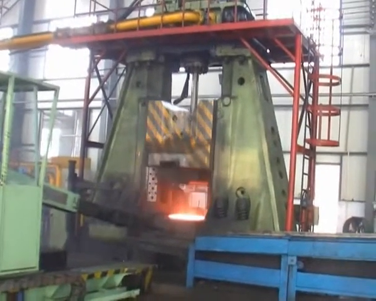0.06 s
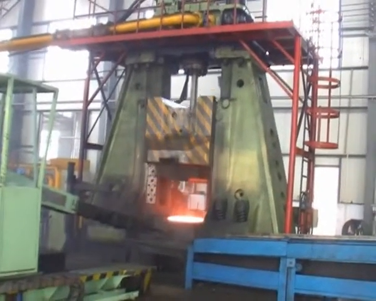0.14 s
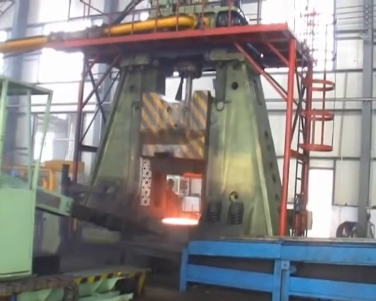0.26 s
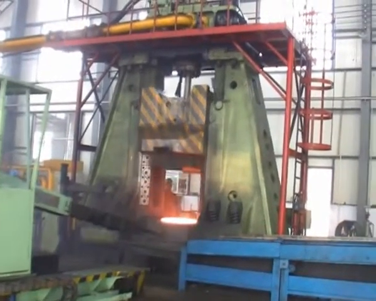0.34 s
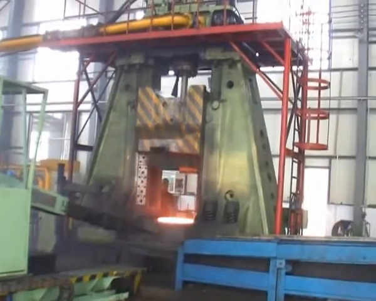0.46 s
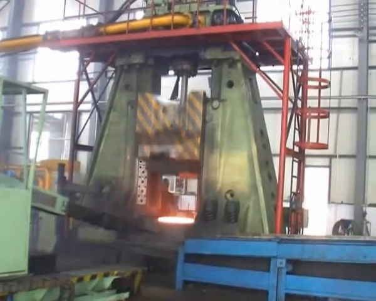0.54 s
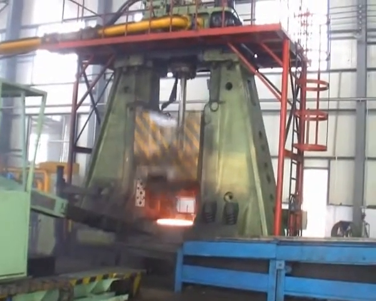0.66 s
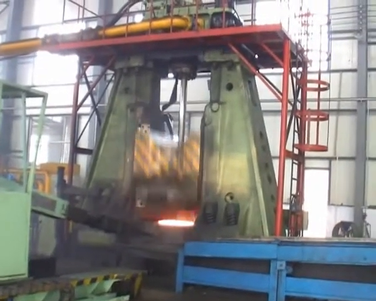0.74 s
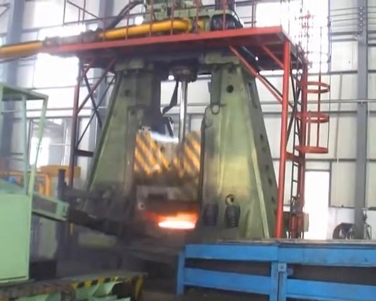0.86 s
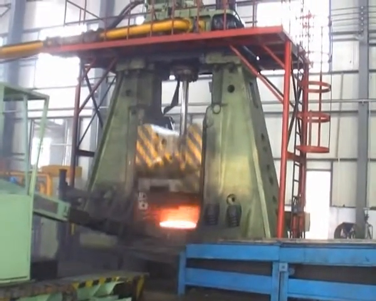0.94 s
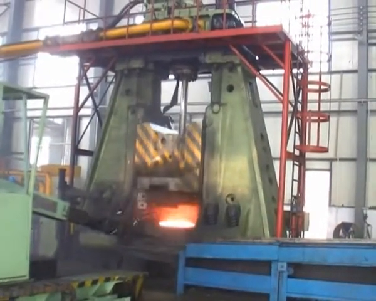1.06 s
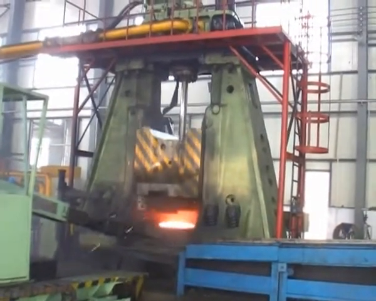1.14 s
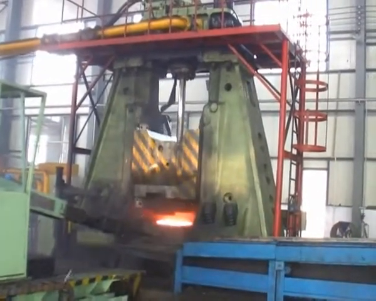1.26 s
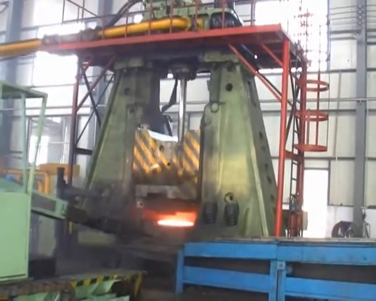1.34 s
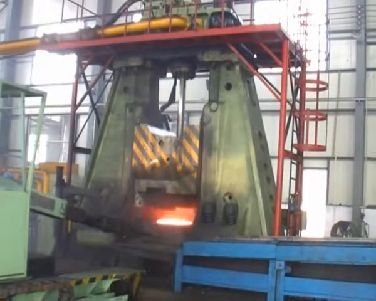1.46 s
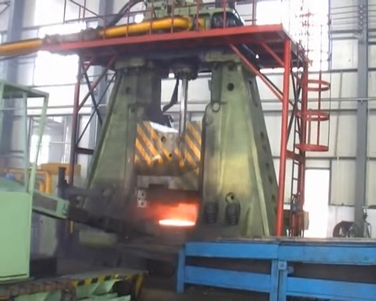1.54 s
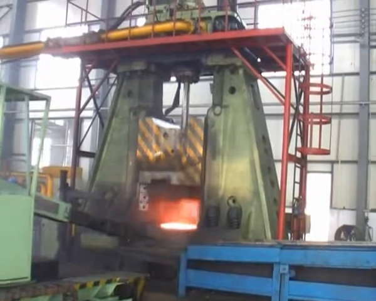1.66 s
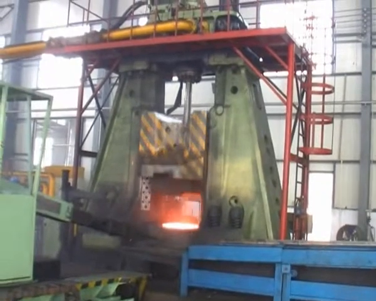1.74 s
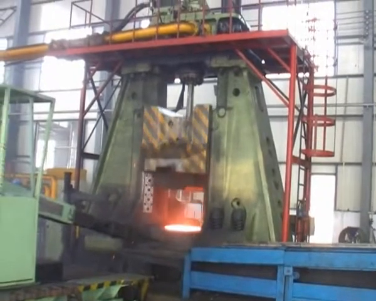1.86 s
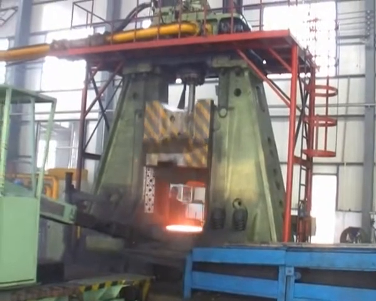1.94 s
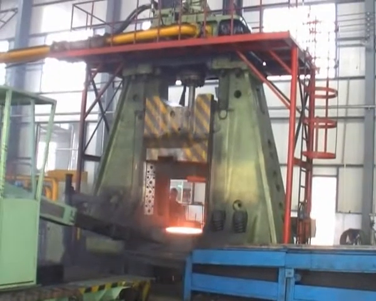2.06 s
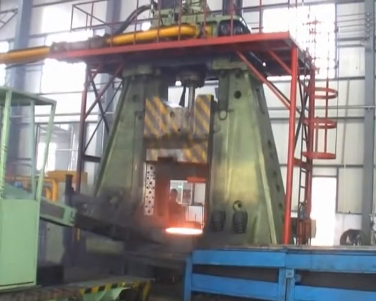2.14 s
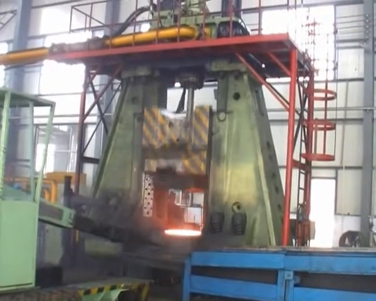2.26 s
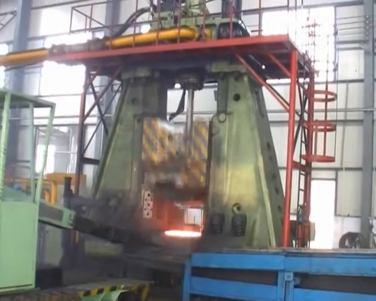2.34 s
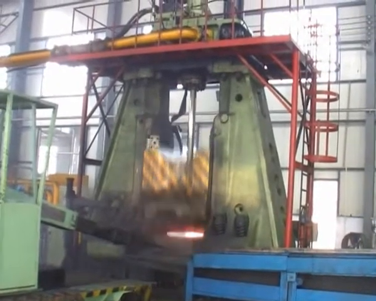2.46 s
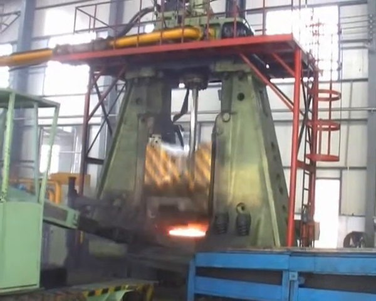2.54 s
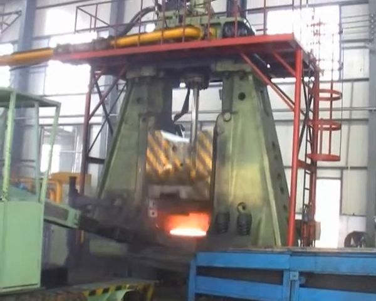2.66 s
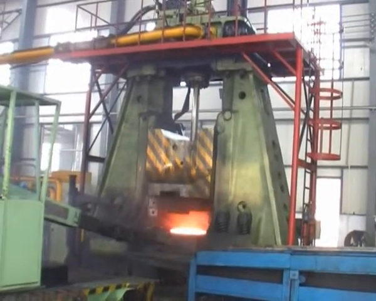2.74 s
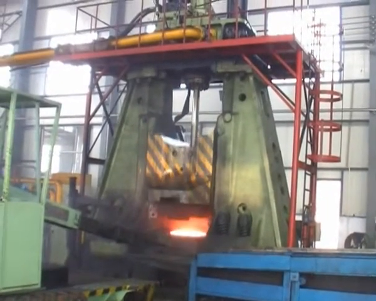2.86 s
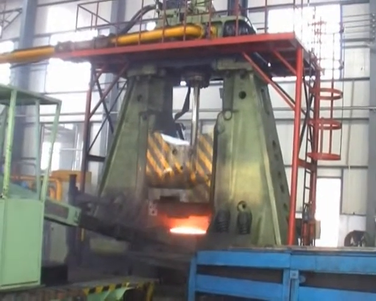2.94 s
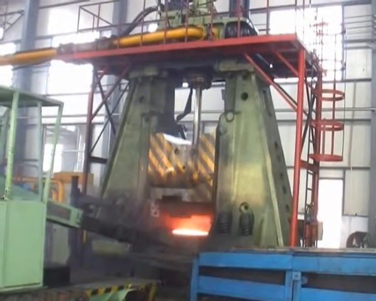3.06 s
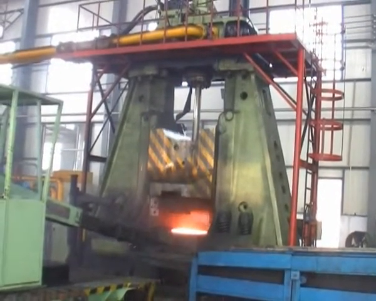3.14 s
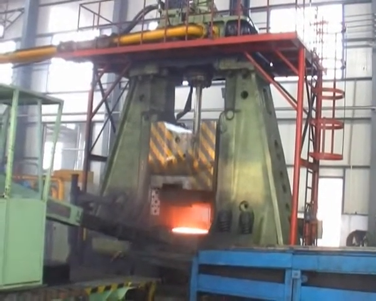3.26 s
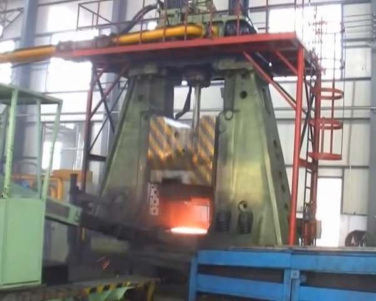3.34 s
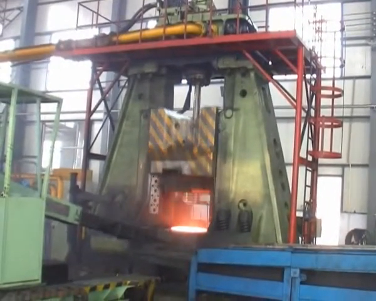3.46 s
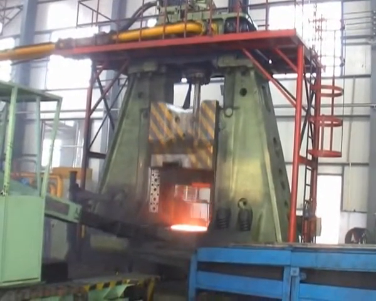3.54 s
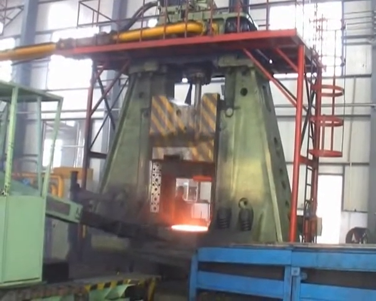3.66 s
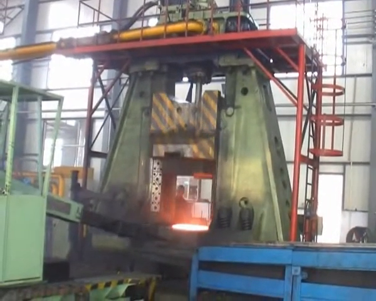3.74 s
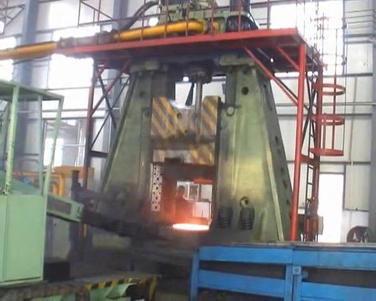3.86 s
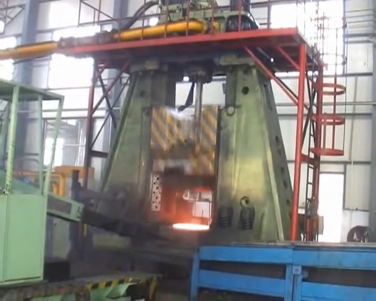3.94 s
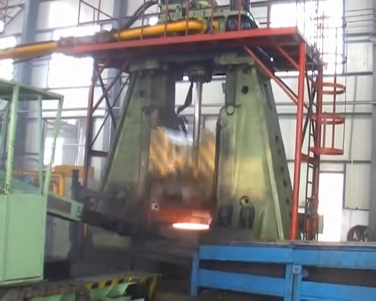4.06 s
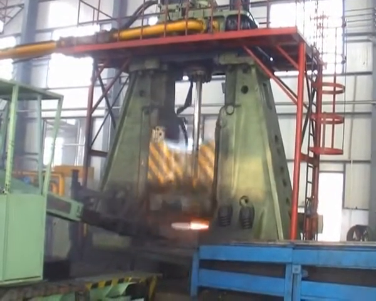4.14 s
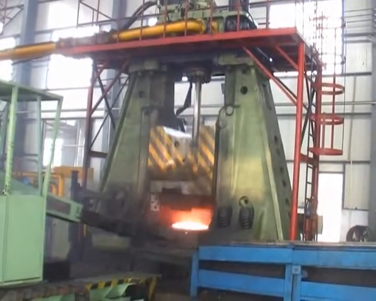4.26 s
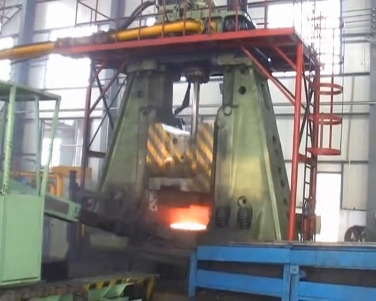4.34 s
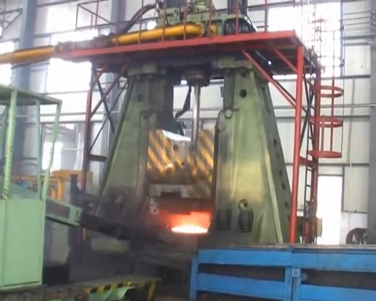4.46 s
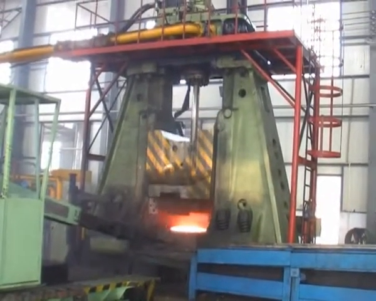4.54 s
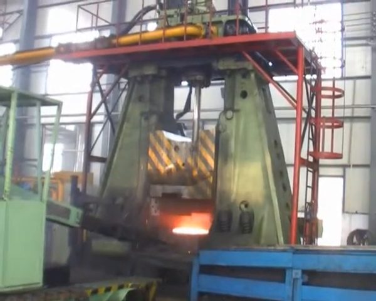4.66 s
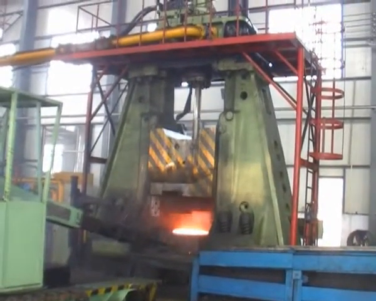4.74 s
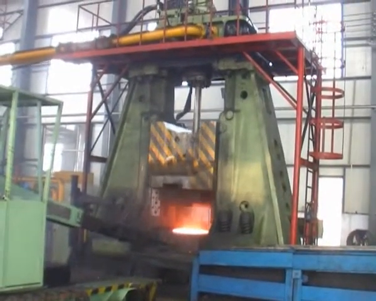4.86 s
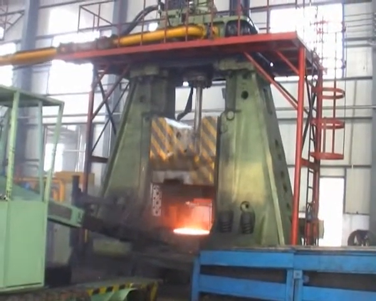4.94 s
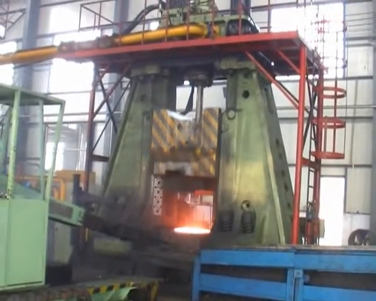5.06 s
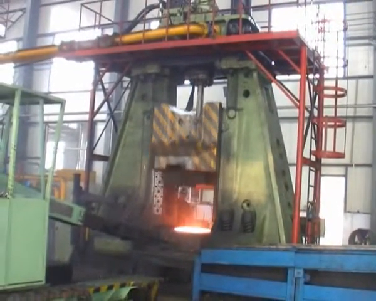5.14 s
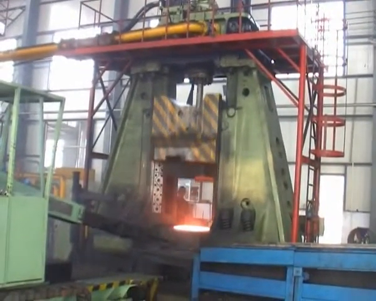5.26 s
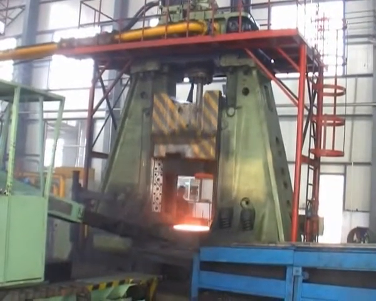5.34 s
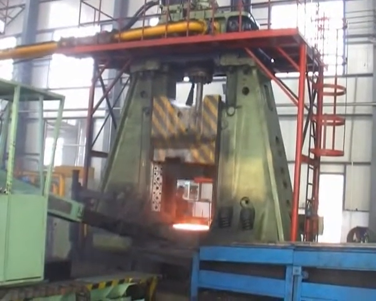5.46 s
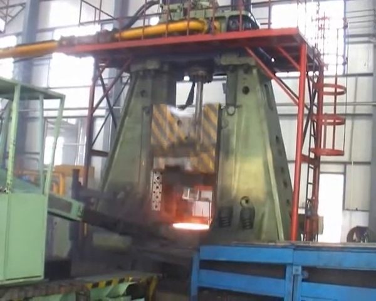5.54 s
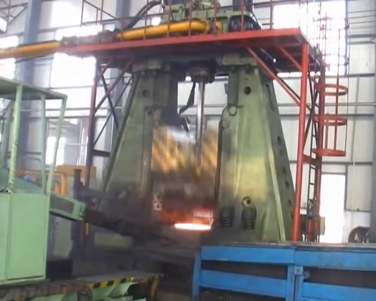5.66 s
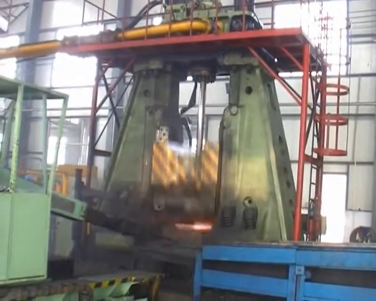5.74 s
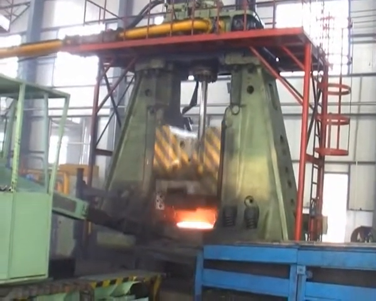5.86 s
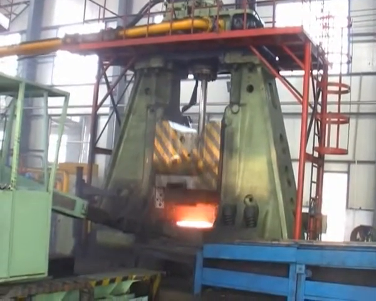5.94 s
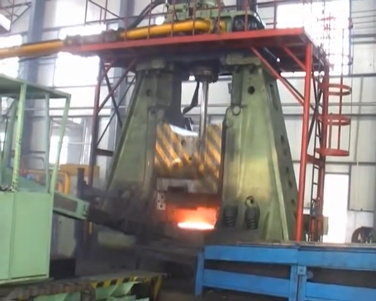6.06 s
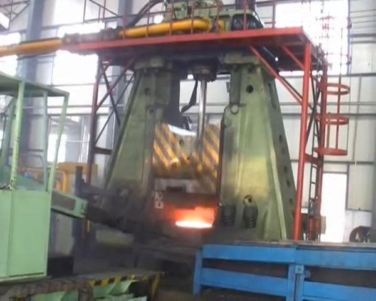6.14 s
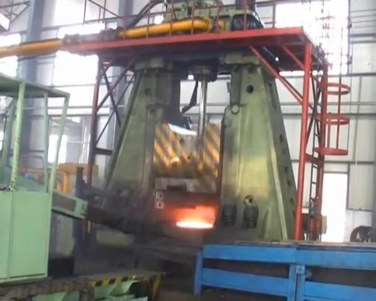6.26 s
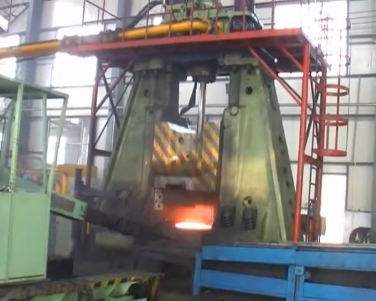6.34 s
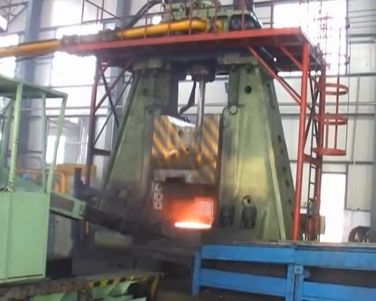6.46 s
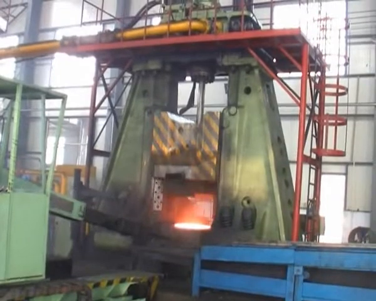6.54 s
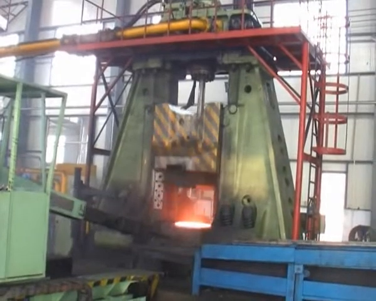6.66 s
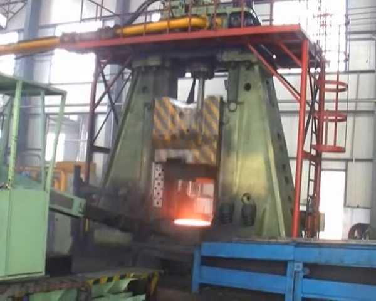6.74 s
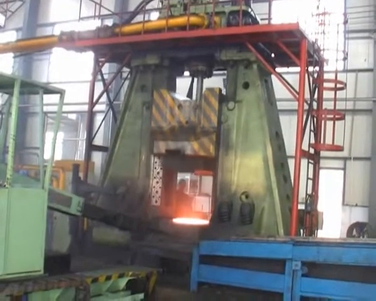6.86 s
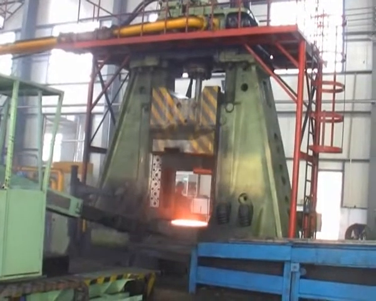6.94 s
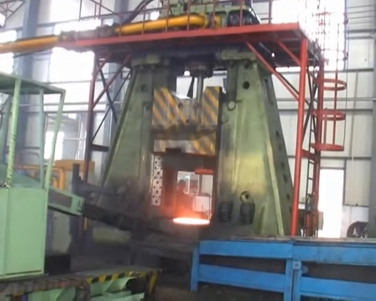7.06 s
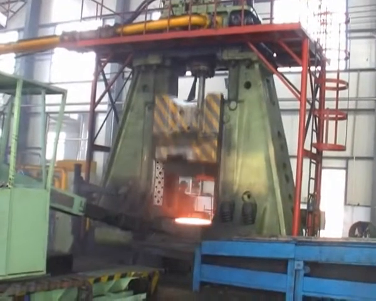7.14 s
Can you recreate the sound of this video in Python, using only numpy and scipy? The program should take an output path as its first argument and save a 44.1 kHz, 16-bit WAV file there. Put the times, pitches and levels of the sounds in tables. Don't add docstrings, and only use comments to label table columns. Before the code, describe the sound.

The clip opens in a big reverberant forge hall, with the roar of an earlier hammer blow dying away under a steady motor and pump drone, faint wavering gear tones and bright puffs of valve hiss. A short spit of air leads into the first blow at about 0.9 s: a hard, splintery crack of die faces, clanging steel from ram, anvil and frame, and a dense midrange roar with late ringing blooms. It fades over more than a second as hisses resurface. Nearly identical blows follow at 2.65, 4.3 and 5.9 s, the third slightly strongest. Puffs are clearest around 3.5 and 5.1 s, and a last short hiss comes near 7.2 s as the final roar decays. The small stereo microphone clips and ducks at each hit, then recovers; deep bass and extreme treble are missing, with tiny dropouts every second.

```python
import sys
import numpy as np
from scipy import signal
from scipy.io import wavfile
from scipy.ndimage import uniform_filter1d

SR = 44100
rng = np.random.default_rng(int(sys.argv[2]) if len(sys.argv) > 2 else 0)


def voltage_ratio(level):
    return 10 ** (np.asarray(level, float) / 20)


def generate_wav(sig):
    pcm = np.round(np.clip(np.atleast_2d(sig).T, -1, 1) * 32767).astype(np.int16)
    wavfile.write(sys.argv[1], SR, pcm)


N = 317961
CONTROL_STEP = 32


def rms_one(x):
    return x / np.sqrt(np.mean(x ** 2) + 1e-20)


def at_hz(points, hz, column=1):
    table = np.array(points)
    return np.interp(np.log(hz), np.log(table[:, 0]), table[:, column])


def in_time(rows):
    return np.interp(np.arange(N) / SR, *np.transpose(rows))


def control_times():
    return np.arange(0, N + CONTROL_STEP, CONTROL_STEP) / SR


def to_samples(t, envelope):
    return np.interp(np.arange(N) / SR, t, envelope)


def drift(rate_hz):
    step = 40
    r = np.exp(-2 * np.pi * step * rate_hz / SR)
    sparse = rng.standard_normal(N // step + 2002)
    slow = signal.lfilter([1], [1, -2 * r, r * r], sparse)[2000:]
    return np.interp(np.arange(N) / step, np.arange(len(slow)), rms_one(slow))


def ring(drive, hz, t60_s):
    r = voltage_ratio(-60 / (t60_s * SR))
    w = 2 * np.pi * hz / SR
    return signal.lfilter([0, np.sin(w)], [1, -2 * r * np.cos(w), r * r], drive + 1e-18)


# (frequency [Hz], correlation [-1..1])
STEREO_LIKENESS = [(60, 0.45), (200, 0.94), (660, 0.92), (1500, 0.93), (3000, 0.82), (5000, 0.88),
                   (7500, 0.79), (10000, 0.73)]
# (frequency [Hz], level [dB])
STEREO_LEAN = [(60, -9), (110, 5), (200, 2), (360, 1), (660, 0), (1200, 0.5), (2180, 1.5), (3970, 1.5),
               (7230, 4), (13200, -3)]


def banded_noise(spectrum, patchy_db, envelope=lambda hz: 1, noise=lambda: rng.standard_normal((2, 2, N))):
    out, power = 0, 0
    white = noise()
    edges = 850 * 2 ** (np.arange(-12, 13) / 3)
    edges = edges[(edges > 0.8 * spectrum[0][0]) & (edges < 1.25 * spectrum[-1][0])]
    for k, (low, high) in enumerate(zip(edges, edges[1:])):
        hz = np.sqrt(low * high)
        band = signal.butter(3, [low, high], "band", fs=SR, output="sos")
        mid, side = signal.sosfilt(band, white[k % 2])
        alike = np.clip(at_hz(STEREO_LIKENESS, hz), 0, 1)
        lean = voltage_ratio(at_hz(STEREO_LEAN, hz) / 2 * np.array([[1], [-1]]))
        pair = np.sqrt(1 + alike) * mid + np.sqrt(1 - alike) * side * [[1], [-1]]
        level_db = at_hz(spectrum, hz)
        out = out + voltage_ratio(level_db + patchy_db * drift(11.8)) * envelope(hz) * lean * pair
        power += voltage_ratio(level_db) ** 2 * (high - low) * 4 / SR
    return out / np.sqrt(power)


# (frequency [Hz], density [dB per Hz])
PUMP_SPECTRUM = [(60, -36), (110, -20.5), (200, -10), (330, -8.5), (450, -8.5), (620, -11), (760, -12),
                 (950, 1), (1200, -1), (1650, 0.5), (2300, -7), (3300, -16), (4500, -15.5), (7000, -37)]
# (time [s], level [dB])
PUMP_LOAD = [(0.0, -21), (7.21, -19.5)]
WHINE_HZ = [232, 320, 349.5, 522, 694.4, 1007, 1609]
WHINE_DB = [-43, -43, -37, -47, -37, -41, -44]


def pumps():
    t = np.arange(N) / SR
    tones = 0
    for hz, level_db in zip(WHINE_HZ, WHINE_DB):
        height = np.sqrt(2) * voltage_ratio(level_db + 2 * drift(2))
        tones = tones + height * np.sin(2 * np.pi * hz * t + 0.45 * drift(2))
    return voltage_ratio(in_time(PUMP_LOAD)) * banded_noise(PUMP_SPECTRUM, patchy_db=-0.93) + tones


# (frequency [Hz], density [dB per Hz])
HISS_SPECTRUM = [(4000, -17), (5000, -8), (6000, 1.5), (7000, 1.5), (8500, 1.5), (10000, -1.5),
                 (11500, -12.5), (13700, -10)]
# (peak time [s], level [dB], length [s])
PUFFS = [(0.078, -30, 0.16), (0.283, -31, .2), (0.66, -34.5, .35), (1.40, -29.5, .1), (1.647, -29, 0.23),
         (1.876, -29.5, 0.091), (2.197, -31, 0.33), (3.096, -28.5, 0.3), (3.252, -26.5, 0.096),
         (3.528, -26, 0.48), (4.1, -29, 0.23), (4.80, -29, 0.32), (4.948, -29.5, 0.099), (5.131, -24, 0.16),
         (5.354, -30, 0.18), (5.509, -43, 0.052), (5.647, -31.5, 0.23), (6.59, -27, 0.14),
         (6.77, -33.5, 0.3), (7.12, -29.5, 0.18), (7.21, -23.5, 0.056)]
LEAK_DB = -34
SWITCH_LEAD_S, SWITCH_DB, SWITCH_S = 0.057, -29.5, 0.074
PUFF_RISE_SHARE = 0.5


def valves():
    t = control_times()
    switches = [(row[0] - SWITCH_LEAD_S, SWITCH_DB, SWITCH_S) for row in BLOWS]
    power = voltage_ratio(LEAK_DB) ** 2
    for peak_s, level_db, length_s in PUFFS + switches:
        width_s = length_s * np.where(t < peak_s, PUFF_RISE_SHARE, 1 - PUFF_RISE_SHARE)
        power = power + voltage_ratio(level_db) ** 2 * np.exp(-((t - peak_s) / width_s) ** 2)
    return to_samples(t, np.sqrt(power)) * banded_noise(HISS_SPECTRUM, patchy_db=1.0)


SAME_ECHOES = 0.7


def echo_noise():
    starts = np.array([0] + [round(row[0] * SR) for row in BLOWS])
    n = np.arange(N)
    since = n - starts[np.searchsorted(starts, n, "right") - 1]
    fresh = rng.standard_normal((2, 2, N))
    repeated = fresh[..., ::-1][..., since]
    return np.sqrt(1 - SAME_ECHOES) * fresh + np.sqrt(SAME_ECHOES) * repeated


# (frequency [Hz], t60 [s], build-up [s])
HALL = [(80, 1.26, 0.022), (330, 2.17, 0.036), (540, 1.81, 0.0014), (1140, 2.43, 0.0055),
        (2600, 2.27, 0.0021), (6540, 1.26, 0.004), (11030, 0.68, 0.0041)]
# (time [s], roar level [dB])
EARLIER_BLOW = (-0.76, 7.7)


def reverberation(hz, lasting=1):
    t = control_times()
    t60_s, build_up_s = at_hz(HALL, hz), at_hz(HALL, hz, column=2)
    power = 0
    for s, *_, roar_db in [EARLIER_BLOW, *BLOWS]:
        age = np.maximum(t - s - 0.002, 0)
        lull = 1 - 0.8 * np.exp(-((age - 0.012) / 0.003) ** 2)
        build_up = 1 - np.exp(-age / build_up_s)
        power += voltage_ratio(roar_db - 60 * age / t60_s / lasting) ** 2 * lull * build_up ** 2
    return to_samples(t, np.sqrt(power))


# (frequency [Hz], density [dB per Hz])
ROAR_SPECTRUM = [(60, -37), (120, -8), (200, -1.5), (330, 0.5), (480, -2.5), (700, 1), (900, 6),
                 (1200, 2.5), (1600, 3), (2200, 0), (3500, -5), (6500, -8.5), (10000, -13), (13500, -25)]


def hall_roar():
    return banded_noise(ROAR_SPECTRUM, patchy_db=0.64, envelope=reverberation, noise=echo_noise)


FRAME_HZ = [326, 387, 560, 662, 807, 855, 904, 952, 1006, 1107, 1227, 1422, 1464, 1523, 1604, 1775, 1975,
            2150]
# (level over the roar [dB], t60 [s])
FRAME_RINGING = [(-20, 0.41), (-20, 0.37), (-17, 0.51), (-23.5, 0.51), (-28, 0.13), (-20, 0.081),
                 (-41, 0.12), (-11, 0.095), (-16, 0.3), (-14.5, 0.15), (-29, 0.11), (-18, 0.51), (-27, 1),
                 (-28, 0.73), (-19, 0.95), (-23.5, 0.6), (-21.5, 0.26), (-25, 0.22)]


def frame():
    out, white = 0, echo_noise()[0]
    pair = white[0] + 0.13 * white[1] * [[1], [-1]]
    for hz, (level_db, t60_s) in zip(FRAME_HZ, FRAME_RINGING):
        steady_rms = np.sqrt(t60_s * SR / (4 * np.log(1000)))
        drive = pair * reverberation(hz, lasting=0.97)
        out = out + voltage_ratio(level_db) / steady_rms * ring(drive, hz, t60_s)
    return out


# (frequency [Hz], level over the roar [dB], delay [s], swell [s], t60 [s])
ANVIL_NOTES = [
    (807, -10, 0, 0.02, 0.56),
    (321, -5.5, 0.096, 0.054, 0.63),
    (1236, -1, 0.0095, 0.0035, .12),
    (950, -7, 0.019, 0.022, 0.15),
    (1091, -5.5, .025, 0.032, 0.49),
    (1422, -5.5, .03, 0.037, 0.67),
    (1008, -6.5, .05, 0.046, 0.53),
    (934, -9, 0.14, 0.027, 0.2),
    (838, -6, .26, .03, .3),
    (975, -8.5, 0.232, 0.027, .4),
]


def anvil():
    length = 2 * SR
    out, t = np.zeros(N + length), np.arange(length) / SR
    for hz, level_db, delay_s, swell_s, t60_s in ANVIL_NOTES:
        age = np.maximum(t - delay_s, 0)
        envelope = voltage_ratio(level_db - 60 * age / t60_s) * (1 - np.exp(-(age / swell_s) ** 2))
        note = envelope * np.sin(2 * np.pi * hz * age)
        for s, _, roar_db in BLOWS:
            start = round(s * SR)
            out[start:start + length] += voltage_ratio(roar_db) * note
    return out[:N]


# (time [s], crack peak [dB], roar level [dB])
BLOWS = [
    (0.931, -12, 8),
    (2.65, -12, 8.5),
    (4.267, -12, 9),
    (5.888, -12, 8.5),
]
# (frequency [Hz], level [dB], t60 [s])
DIE_FACES = [(1100, 13, 0.0035), (2850, 1, 0.031), (3580, -1.5, 0.042), (6520, 1.5, 0.0087),
             (8380, -5.5, 0.037)]


def crack():
    clicks = np.zeros(N)
    hits = [round((row[0] + 0.0009) * SR) for row in BLOWS]
    clicks[hits] = voltage_ratio(np.array(BLOWS)[:, 1] + 10)
    fading = signal.lfilter([1], [1, -voltage_ratio(-60 / (0.06 * SR))], clicks)
    white = rng.standard_normal((2, N))
    pair = white[0] + 0.3 * white[1] * [[1], [-1]]
    splinter = signal.sosfilt(signal.butter(2, [500, 8000], "band", fs=SR, output="sos"), pair)
    pings = sum(voltage_ratio(level_db) * ring(-clicks, hz, t60_s) for hz, level_db, t60_s in DIE_FACES)
    return pings + voltage_ratio(-13) * fading * splinter


def scene():
    background = pumps() + valves()
    lean = voltage_ratio(np.array([[0.6], [-0.6]]))
    return background + hall_roar() + frame() + anvil() + crack() * lean


# (frequency [Hz], width [Hz], boost [dB])
CAPSULE = [
    (7030, 1720, 6),
    (710, 223, -3.5),
]


def microphone(x):
    x = signal.sosfilt(signal.butter(8, 92, "high", fs=SR, output="sos"), x)
    for hz, width_hz, boost_db in CAPSULE:
        peak = signal.lfilter(*signal.iirpeak(hz, hz / width_hz, SR), x)
        x = x + (voltage_ratio(boost_db) - 1) * peak
    return x


def gain_control(x, knee_db=-21, slope=0.63, release_db_s=45, ceiling=0.49):
    pole = np.exp(-1 / (0.0018 * SR))
    power = signal.lfilter([1 - pole], [1, -pole], np.mean(x ** 2, axis=0))
    level_db = 10 * np.log10(power + 1e-9)
    ramp_db = release_db_s * np.arange(N) / SR
    held_db = np.maximum.accumulate(level_db + ramp_db) - ramp_db
    wanted_db = -slope * np.maximum(held_db - knee_db, 0)
    gain_db = signal.lfilter([1 - pole], [1, -pole], wanted_db)
    top = np.minimum(ceiling * voltage_ratio(np.maximum(gain_db - wanted_db, 0)), 0.88)
    x = x * voltage_ratio(gain_db) / top
    return top * x / (1 + x ** 4) ** 0.25


DROPOUT_S, MUTE_S, FADE_IN_S = 0.2301, 0.0014, 0.0022


def dropouts():
    since = (np.arange(N) / SR - DROPOUT_S) % 1
    return np.clip((since - MUTE_S) / FADE_IN_S, 0.12, 1)


def treble_gate(x, mid_db=-39.0, side_db=-45, tilt_db=0.9, jitter_db=3.0):
    hz, _, z = signal.stft([x[0] + x[1], x[0] - x[1]], SR, nperseg=2048)
    jitter = voltage_ratio(jitter_db * rng.standard_normal(z.shape[2])) ** 2
    total = np.sum(np.abs(z[0]) ** 2, axis=0) * jitter
    for low in range(9000, 13800, 300):
        band = (hz >= low) & (hz < low + 300)
        floor = voltage_ratio(np.array([[mid_db], [side_db]]) + tilt_db * (low - 11000) / 1000) ** 2
        share = np.sum(np.abs(z[:, band]) ** 2, axis=1) / total
        z[:, band] *= (uniform_filter1d(share, size=3) > floor)[:, None]
    z[0, hz > 13700] = 0
    z[1, hz > 11000] = 0
    mid, side = signal.istft(z, SR, nperseg=2048)[1][:, :N]
    return np.array([mid + side, mid - side]) / 2


def top_cut(x):
    return signal.sosfilt(signal.butter(12, 13760, fs=SR, output="sos"), x)


def record(dry):
    x = gain_control(microphone(dry))
    x = signal.sosfilt(signal.butter(2, [70, 14000], "band", fs=SR, output="sos"), x)
    mix = treble_gate(x * dropouts())
    return top_cut(mix)


dry = scene()
out = record(dry)
generate_wav(out)
```